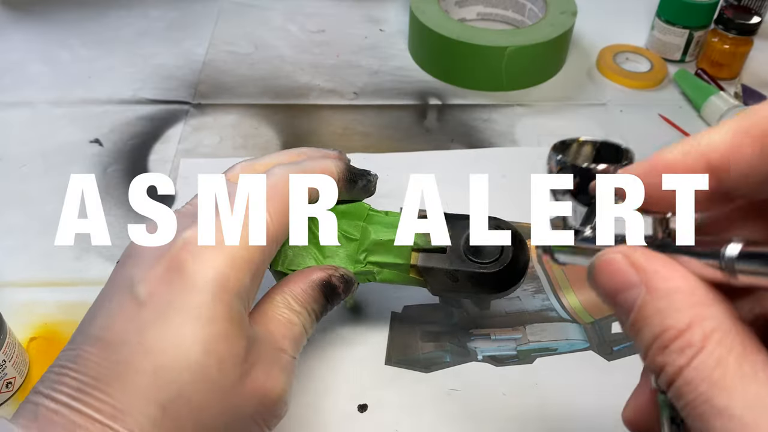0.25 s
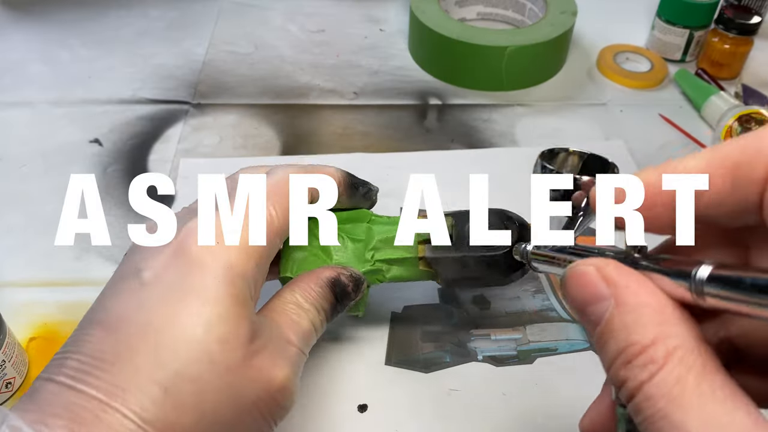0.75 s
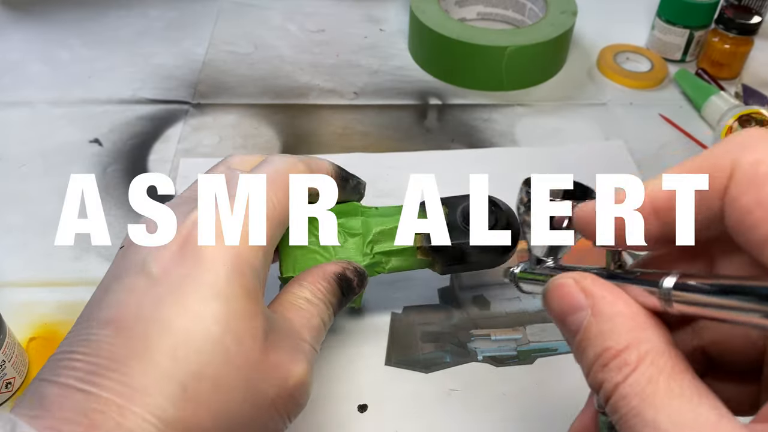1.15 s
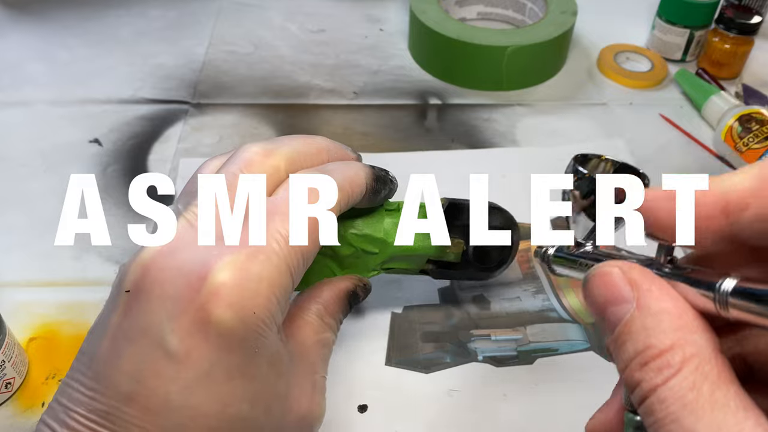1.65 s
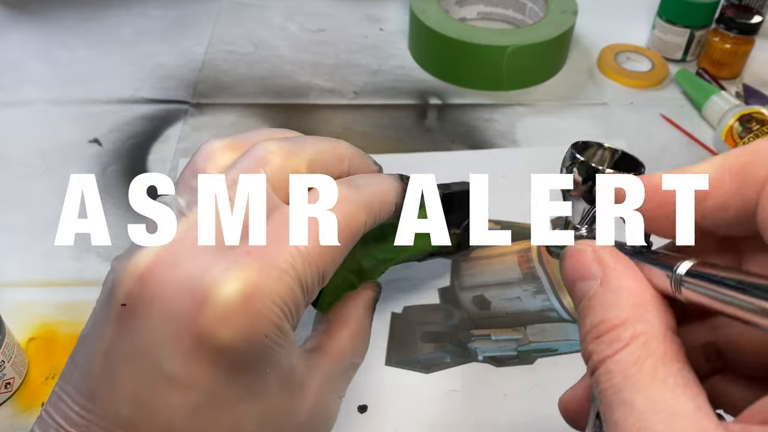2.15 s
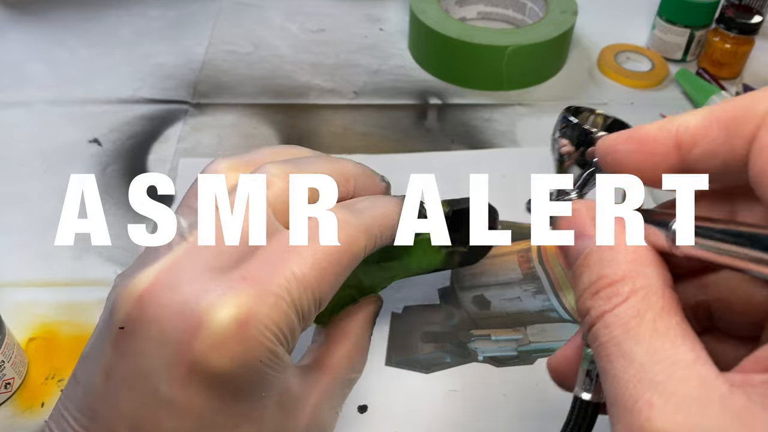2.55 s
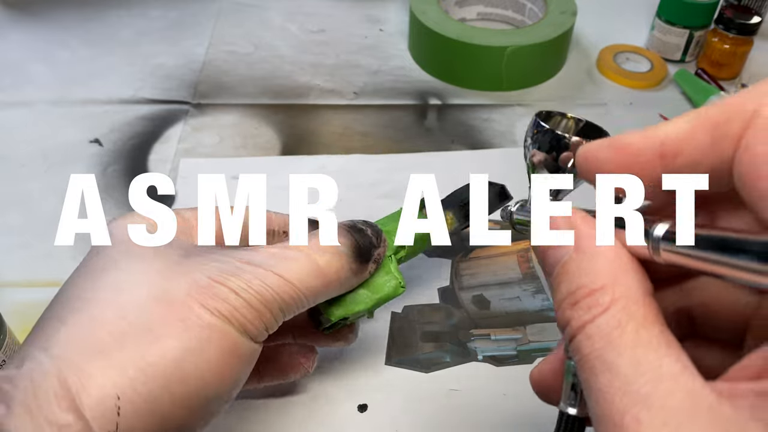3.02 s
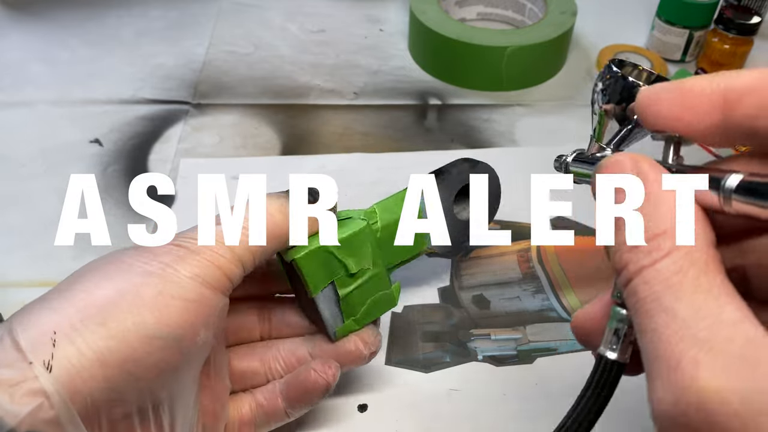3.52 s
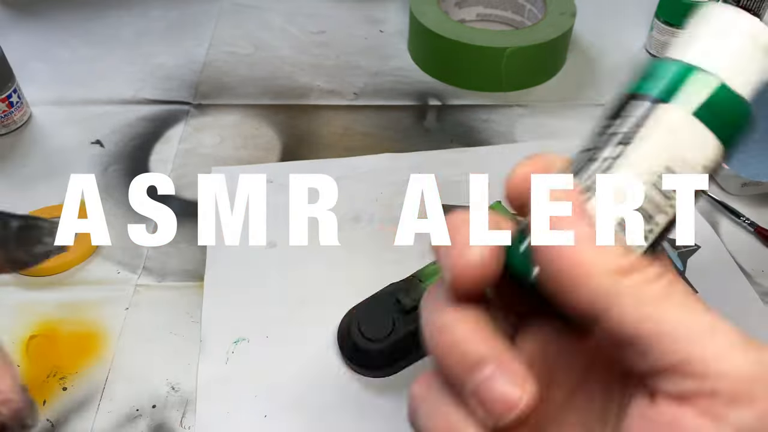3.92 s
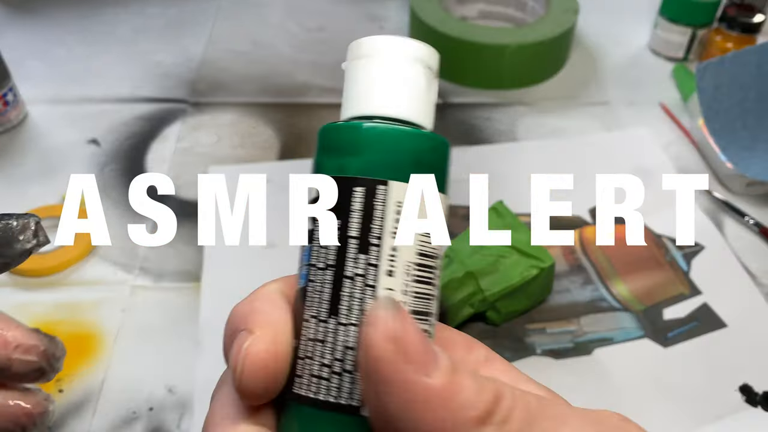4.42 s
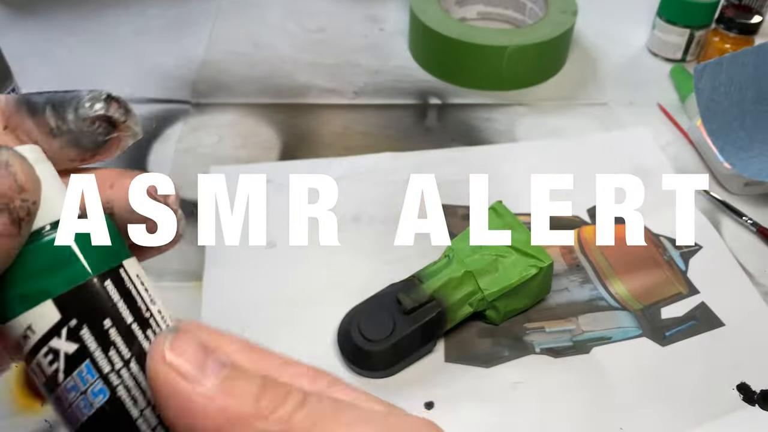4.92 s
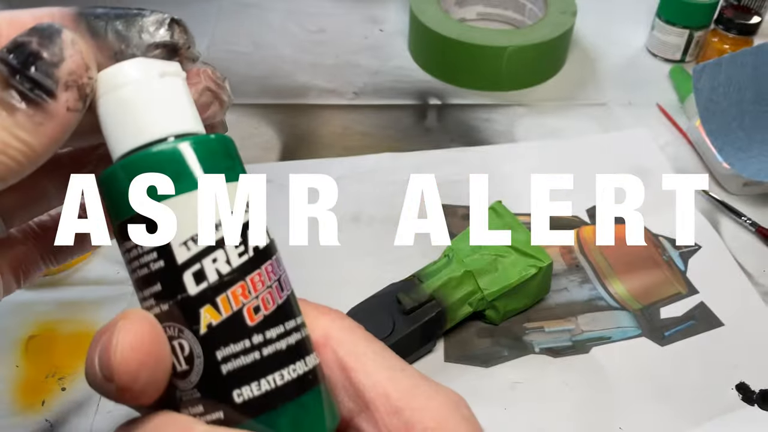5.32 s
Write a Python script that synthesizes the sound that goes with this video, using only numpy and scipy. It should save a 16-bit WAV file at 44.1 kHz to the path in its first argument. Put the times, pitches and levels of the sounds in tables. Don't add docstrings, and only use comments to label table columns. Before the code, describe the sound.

Bright, breathy bursts of pressurised air, short and long, splash and flutter against a small object, with a buzzing compressor tone filling the gaps. The tone fades just before a final, nearer spray. At about four seconds everything drops away to very quiet close handling: slick glove friction, crinkles, a cluster of hollow cap knocks, then small snaps and a short creak. Dry, indoor, the same in both channels.

```python
import sys
import numpy as np
from scipy import signal
from scipy.fft import rfft, irfft
from scipy.io import wavfile
from scipy.ndimage import uniform_filter1d, map_coordinates

SR = 44100
rng = np.random.default_rng(int(sys.argv[2]) if len(sys.argv) > 2 else 0)


def gain_from_db(level_db):
    decades = np.asarray(level_db, float) / 20
    return 10 ** decades


def materialize(psi):
    bounded = np.clip(np.atleast_2d(psi).T, -1, 1)
    quanta = np.round(bounded * 32767).astype(np.int16)
    wavfile.write(sys.argv[1], SR, quanta)


N = 245637
TIME = np.arange(N) / SR
FREQ = np.maximum(np.arange(N // 2 + 1) * SR / N, 1)
CLOSER_S, BOTTLE_S = 3.64, 3.9425

# opens t/s, shuts t/s, shutting time t/s, leak before opening t/s
VALVE = [
    (-.1, .3075, .0045, .01),
    (.536, 1.231, .003, .024),
    (1.444, 1.7865, .004, .026),
    (2.003, 2.604, .012, .012),
    (2.948, 3.273, .0055, .04),
    (3.663, 4.0, .01, .042),
]


def unit(x):
    return x / np.sqrt(np.mean(x ** 2))


def walk(rate):
    k = int(SR / rate)
    held = np.repeat(rng.standard_normal(N // k + 1), k)
    return 1.3 * uniform_filter1d(uniform_filter1d(held, k), k)[:N]


def curves(tables):
    s, *columns = np.transpose(np.vstack(tables))
    return [np.interp(TIME, s, c) for c in columns]


def hiss(colour, edges_hz, count, patchy_db, rate, grain_db):
    hz, db = np.transpose(colour)
    spit = gain_from_db(grain_db * walk(900))
    spectrum = rfft(rng.standard_normal(N) * spit) * gain_from_db(np.interp(np.log(FREQ), np.log(hz), db))
    layers = []
    for lo, hi in zip(edges_hz[:-1], edges_hz[1:]):
        place = count * np.log(FREQ / lo) / np.log(hi / lo) - .5
        layer = 0
        for k in range(count):
            strip = irfft(spectrum * np.cos(np.pi / 2 * np.clip(place - k, -1, 1)), N)
            layer = layer + strip * gain_from_db(patchy_db * walk(rate))
        layers.append(unit(layer))
    return layers


def ring(x, hz, width_hz):
    return signal.lfilter(*signal.iirpeak(min(hz, 16000), hz / width_hz, fs=SR), x)


def clicks(rows, crack_db, crack_s, crack_hz):
    out, t = np.zeros(N), TIME[:SR // 20]
    noises = rng.standard_normal((len(rows), 2, len(t)))
    for (s, db, hz, t60, top_db), noise in zip(rows, noises):
        crack = ring(noise[0] * np.exp(-(t / crack_s) ** 2), crack_hz, 9900)
        crack = ring(crack, crack_hz, 9000)
        tone = np.sin(2 * np.pi * hz * t) + 0.57 * unit(ring(noise[1], hz, 0.28 * hz))
        tone = tone * gain_from_db(-60 * t / max(t60, .002)) * np.minimum(t / 0.00034, 1)
        click = gain_from_db(db) * tone / np.abs(tone).max()
        click = click + gain_from_db(top_db + crack_db) * crack / np.abs(crack).max()
        out[int(s * SR):][:len(t)] += click
    return out


def valve_flow():
    opening_s, leak_db, tail_db, tail_s = .009, -11.5, -19, 0.034
    flow = 0
    for opens, shuts, shutting, leak in VALVE:
        opened = np.clip((TIME - opens) / opening_s + 1, 0, 1) ** 2
        leaking = gain_from_db(leak_db) * np.clip((TIME - opens) / leak + 1, 0, 1)
        after = np.maximum(TIME - shuts, 0)
        closing = np.exp(-(after / shutting) ** 2) + gain_from_db(tail_db) * np.exp(-after / tail_s)
        flow = flow + np.minimum(opened + leaking, 1) * closing / (1 + gain_from_db(tail_db))
    return flow


def airbrush():
    # t/s, air flow level/dB, strike on the part level/dB,
    # flutter round its edges level/dB
    bursts = [
        [(0.0, -32, -7.5, -53), (0.118, -33, -13.5, -45.5), (0.18, -31, -14.5, -49.5), (0.236, -33, -13.5, -40),
         (0.305, -32, -10.5, -52)],
        [(0.54, -33.5, -10.5, -48), (0.64, -32, -10.5, -47), (0.69, -38, -5.5, -43), (0.758, -32, -8, -49.5),
         (0.88, -34.5, -6.5, -48), (0.97, -29.5, -10, -52.5), (1.228, -32, -4, -53.5)],
        [(1.45, -37.5, -6, -43), (1.61, -32, -8.5, -41.5), (1.634, -35, -8, -42), (1.784, -33, -13, -48)],
        [(2.008, -40, -10, -47), (2.234, -36.5, -12.5, -46), (2.458, -36, -8.5, -47), (2.6, -36.5, -4.5, -45.5)],
        [(2.95, -34, -7.5, -44), (3.01, -38, -10, -41), (3.12, -31, -3.5, -43.5), (3.21, -33.5, -6.5, -43),
         (3.27, -31, -4, -42.5)],
        [(3.665, -37.5, -14.5, -45.5), (3.7, -38, -8, -45), (3.745, -30.5, -1.5, -39),
         (3.82, -28, -13.5, -46.5), (3.94, -30, -9, -48.5)],
    ]
    # f/Hz, density level/dB
    jet_colour = [(60, -44.5), (153, -30), (300, -26.5), (492, -17.5), (1000, -10), (1280, -7.5),
                  (1650, 11.5), (2100, -5.5), (2900, -5), (4100, -7.5), (6140, -4), (10000, -3.5),
                  (11800, -2), (16000, -1)]
    # t/s, peak level/dB, centre f/Hz
    trigger_ticks = [(0.3378, -17, 11300), (1.2484, -20.5, 11900), (1.812, -23, 12900), (1.9455, -46, 6180),
                     (2.6964, -46, 11500), (2.7065, -43, 6250), (2.715, -40.5, 8190), (2.7244, -42, 9930),
                     (2.7282, -36, 8550), (2.7414, -40, 8200), (2.7634, -39, 7950), (2.8315, -50, 10900),
                     (2.8607, -45, 10500), (3.2992, -19.5, 11500)]
    flutter, body, splash, jet, edge = hiss(jet_colour, [110, 1200, 1900, 4200, 9000, 16500],
                                            count=5, patchy_db=1.87, rate=14, grain_db=0.5)
    air_db, strike_db, flutter_db = curves(bursts)
    strike_db = strike_db + 7
    body_db = -7 + 0.5 * (flutter_db + 46) + .7 * strike_db
    struck = gain_from_db(body_db) * body + gain_from_db(-3 + strike_db) * splash
    free = gain_from_db(-3.5 + 0.49 * strike_db) * jet + gain_from_db(-1 - .1 * strike_db) * edge
    flapping = gain_from_db(1.84 + flutter_db) * flutter
    spray = valve_flow() * (flapping + gain_from_db(air_db) * (struck + free))
    comb_hz = 2803 * (1 + 0.012 * walk(3.5))
    bench = map_coordinates(spray, [np.arange(N) - SR / comb_hz], order=3)
    cancelled = ring(spray, 4380, 1300) + 0.8 * ring(spray, 2250, 500) + 0.7 * ring(spray, 1050, 400)
    spray = spray - 0.39 * (TIME > CLOSER_S) * cancelled
    tick_rows = [(s + .0001, db - 7.5, hz, .004, db) for s, db, hz in trigger_ticks]
    ticks = clicks(tick_rows, crack_db=-4.5, crack_s=0.0008, crack_hz=11500)
    puff_s, rise_s, fall_s = 3.558, .006, 0.019
    puff = gain_from_db(-54.5) * np.exp(-((TIME - puff_s) / np.where(TIME < puff_s, rise_s, fall_s)) ** 2)
    return (spray + gain_from_db(-16.5) * bench) * (TIME < BOTTLE_S) + ticks + edge * puff


def compressor():
    # multiple of the shaft speed, level/dB
    shaft_orders = [(3, -27), (7, -23), (8, -24), (9, -19), (10, -19), (11, -18), (14, -27), (16, -15),
                    (17, -26), (19, -18), (22, -11), (23, -19), (24, -21), (25, -24), (30, -20), (31, -18),
                    (33, -19), (34, -11), (37, 0), (38, 0), (39, -11), (40, -8), (41, -1), (42, -8),
                    (44, -8), (47, -17), (49, -18), (51, -18), (63, -27), (68, -21), (76, -23), (79, -22),
                    (81, -18), (83, -21)]
    # centre f/Hz, width f/Hz, level/dB
    casing = [(503, 320, -36), (1180, 350, -24), (1820, 81, -16.5), (2043, 190, 2.5), (2170, 470, -5.5),
              (2425, 27, -16), (2805, 280, -9), (3000, 100, -25), (3325, 120, -12), (3770, 140, -15),
              (4250, 200, -11), (4494, 160, -18), (5900, 300, -20), (10370, 460, -30.5)]
    # f/Hz, density level/dB
    air_colour = [(35, -80.5), (60, -43), (294, -14), (346, -20), (607, -24.5), (698, -27), (1220, -23.5),
                  (1580, -25), (2050, -12), (3270, -33.5), (4420, -21.5), (5720, -40.5), (16000, -37)]
    shaft_hz, sag_hz_per_s, load_hz, load_s = 55.4, .06, .36, .15
    shut = 1 - sum((TIME > opens) & (TIME < shuts) for opens, shuts, *_ in VALVE)
    load = signal.lfilter([1 / (load_s * SR)], [1, 1 / (load_s * SR) - 1], shut)
    turn = 2 * np.pi * np.cumsum(shaft_hz - sag_hz_per_s * TIME - load_hz * load) / SR
    slip = turn / 3
    order, db = np.transpose(shaft_orders)
    order = np.round(order).astype(int)
    shape = np.full(128, -26.)
    shape[order] = db
    ringdown = -np.imag(signal.hilbert(np.log(gain_from_db(np.r_[shape, shape[::-1]]))))
    wobble = .002 * walk(25)
    whine = 0
    for k, start in zip(order, rng.uniform(0, 2 * np.pi, len(order))):
        phase = k * (turn + wobble) + (ringdown[k] if k > 32 else k * start)
        beat = 0.0105 * min(k, 50) * (np.sin(phase + slip) - np.sin(phase - slip))
        whine = whine + gain_from_db(shape[k] + 0.2 * walk(22)) * (np.sin(phase) + beat)
    valve = rng.standard_normal(N) * (1 + .4 * np.sin(turn))
    rattle = sum(gain_from_db(db) * ring(ring(valve, hz, width), hz, width) for hz, width, db in casing)
    low, high = hiss(air_colour, [60, 4000, 16500], count=5, patchy_db=-4.0, rate=20, grain_db=1.0)
    hum = np.sin(2 * np.pi * 295.1 * TIME)
    body = unit(whine) + gain_from_db(-8) * unit(rattle) + gain_from_db(-17) * low + gain_from_db(-22) * high + gain_from_db(-19) * hum
    fade_s = 3.56
    fade = np.clip((CLOSER_S - TIME) / (CLOSER_S - fade_s), 0, 1) ** 2.3
    swell_db = 0.5 * (TIME - 1.08) ** 2
    return body * fade * gain_from_db(-42 + swell_db)


def hands():
    # f/Hz, density level/dB
    glove_colour = [(200, -6), (500, -11), (750, -20), (1020, -2.5), (1320, -7), (1930, -3.5), (2690, -4.5),
                    (5800, 0), (8090, -4), (12300, -1.5), (16000, -5)]
    # touch t/s, firmest t/s, let go t/s, level/dB, crinkle level/dB
    strokes = [(3.93, 3.98, 4.0, -63, 4), (3.993, 4.03, 4.07, -64, 0.5), (4.042, 4.088, 4.18, -70, -4),
               (4.236, 4.308, 4.34, -63, 0), (4.335, 4.4, 4.6, -67.5, -2.5), (4.56, 4.595, 4.64, -68.5, 1),
               (4.6, 4.686, 4.745, -66, 1.5), (4.76, 4.786, 4.89, -62, 3), (4.82, 4.94, 5.0, -61, 5.5),
               (4.952, 5.07, 5.11, -59, 2.5), (5.05, 5.134, 5.19, -64.5, 0.5),
               (5.14, 5.205, 5.24, -63.5, 2), (5.217, 5.285, 5.34, -68.5, 1)]
    # t/s, peak level/dB, centre f/Hz, crack level/dB
    snap_rows = [(3.9972, -47, 3390, -50), (4.0023, -34, 6600, -39), (4.0026, -40, 4800, -60),
                 (4.0057, -38, 13000, -41), (4.0098, -41, 5380, -44), (4.0124, -43, 6200, -47),
                 (4.0212, -44, 2000, -42), (4.0804, -35, 4340, -39.5), (4.084, -38.5, 3770, -60),
                 (4.0982, -44, 4500, -60), (4.1464, -56, 4400, -64), (4.786, -47, 4230, -52),
                 (5.0484, -48, 10500, -52), (5.0564, -51, 10100, -57), (4.971, -46, 1910, -57),
                 (5.07, -48, 4000, -50), (5.077, -48, 3500, -50), (5.236, -46, 12900, -58),
                 (5.245, -44, 12500, -53), (5.2546, -54, 2580, -62)]
    # t/s, peak level/dB, centre f/Hz, t60/s, crack level/dB
    knocks = [
        (4.0768, -37.5, 2550, 0.011, -42),
        (4.1106, -39.5, 2250, 0.018, -68),
        (4.1097, -54, 1500, 0.022, -70),
        (4.127, -52, 1440, 0.026, -70),
        (4.076, -53, 1730, 0.022, -72),
        (4.1278, -42.5, 2460, 0.02, -70),
        (4.132, -45, 2550, 0.013, -65),
        (4.6266, -38.5, 2860, 0.011, -58),
        (4.626, -53, 1900, 0.01, -70),
    ]
    palm, creak, rub, rustle = hiss(glove_colour, [200, 900, 3500, 8000, 16500],
                                    count=5, patchy_db=2.0, rate=19, grain_db=1.5)
    out = gain_from_db(-83) * (creak + rub + rustle)
    for touch, firm, go, db, crinkle_db in strokes:
        grip = np.minimum((TIME - touch) / (firm - touch), (go - TIME) / (go - firm))
        grip = np.clip(grip, 0, 1) ** 1.06
        slide = gain_from_db(-13) * palm + gain_from_db(-0.4 * crinkle_db) * creak + gain_from_db(-0.4) * rub
        out = out + gain_from_db(db) * grip * (slide + gain_from_db(crinkle_db) * rustle)
    snaps = [(s, db, hz, .0045, top_db) for s, db, hz, top_db in snap_rows]
    creak_s, gap_s, creak_db, fade_db, creak_hz = 4.9778, .0059, -41.5, -1.2, 2130
    for k, (a, b, c) in enumerate(rng.standard_normal((6, 3))):
        s = creak_s + k * gap_s + .0003 * a
        db = creak_db + k * fade_db + 1.2 * b
        snaps.append((s, db, creak_hz * (1 + 0.074 * c), .0045, creak_db - 17))
    impacts = clicks(snaps + list(knocks), crack_db=5.0, crack_s=0.00063, crack_hz=8500)
    return out * (TIME > BOTTLE_S) + impacts


def squeaks():
    # t/s, length
    # t/s, centre f/Hz, level/dB
    swells = [(.9, 0.23, 11300, -51), (.9, 0.38, 15300, -39), (1.02, 0.26, 2800, -47),
              (2.2, 0.4, 14200, -49), (2.95, 0.36, 14200, -38), (3.253, 0.025, 8500, -29.5),
              (3.612, 0.063, 750, -52), (3.708, 0.11, 6260, -34.5), (3.765, 0.18, 8500, -34),
              (3.79, 0.12, 12100, -42), (3.946, 0.073, 1900, -60), (4.014, 0.062, 1970, -59),
              (4.055, 0.067, 1500, -66), (4.57, .045, 5300, -66), (4.632, 0.023, 2900, -56.5),
              (4.768, 0.086, 4140, -63), (4.813, 0.15, 2000, -63), (4.834, 0.11, 5800, -61.5),
              (4.92, .05, 9200, -59), (4.9, 0.54, 348, -71.5), (0.736, 0.075, 5140, -36.5),
              (0.903, 0.15, 5360, -34), (2.404, 0.15, 5200, -66), (5.085, 0.051, 1300, -61),
              (5.28, .04, 9200, -66)]
    out = 0
    for s, length, hz, db in swells:
        swell = np.sin(np.pi * np.clip((TIME - s) / length, 0, 1))
        width_hz = min(290 + 0.054 * hz, 750)
        out = out + gain_from_db(db) * swell * unit(ring(rng.standard_normal(N), hz, width_hz))
    return out


def room():
    # f/Hz, density level/dB
    room_colour = [(20, -26), (45, -15.5), (110, -4.5), (200, -8), (330, -10), (640, -11.5), (900, -18),
                   (1500, -18.5), (3000, -25.5), (9000, -32), (13000, -35.5), (15800, -38.5)]
    low, high = hiss(room_colour, [20, 400, 17000], count=6, patchy_db=1.5, rate=6, grain_db=0.5)
    bass = gain_from_db(np.where(TIME < CLOSER_S, -9, -3))
    whine = gain_from_db(-79) * np.sin(2 * np.pi * 9972 * TIME + .4 * walk(30))
    return gain_from_db(-70.5) * (bass * low + gain_from_db(-4) * high) + (TIME > BOTTLE_S) * whine


def scene():
    return np.tile(airbrush() + compressor() + hands() + squeaks() + room(), (2, 1))


def top_cut(x):
    return signal.sosfilt(signal.butter(12, 16480, fs=SR, output="sos"), x)


def record(dry):
    low_pass = signal.ellip(12, .3, 45, 15760, fs=SR, output="sos")
    return top_cut(signal.sosfilt(low_pass, dry))


dry = scene()
out = record(dry)
materialize(out)
```